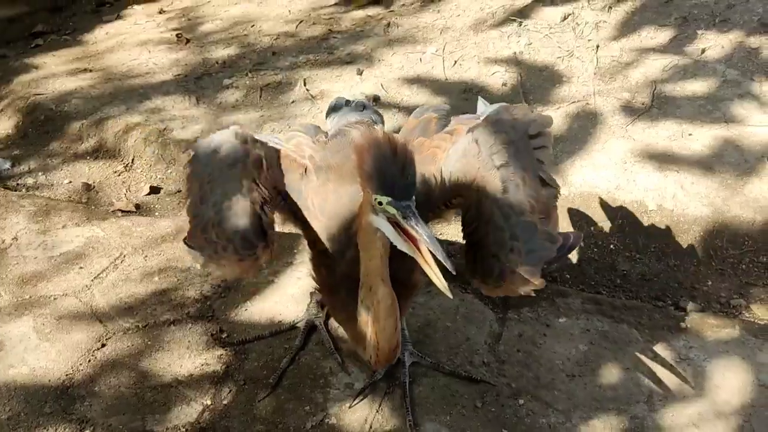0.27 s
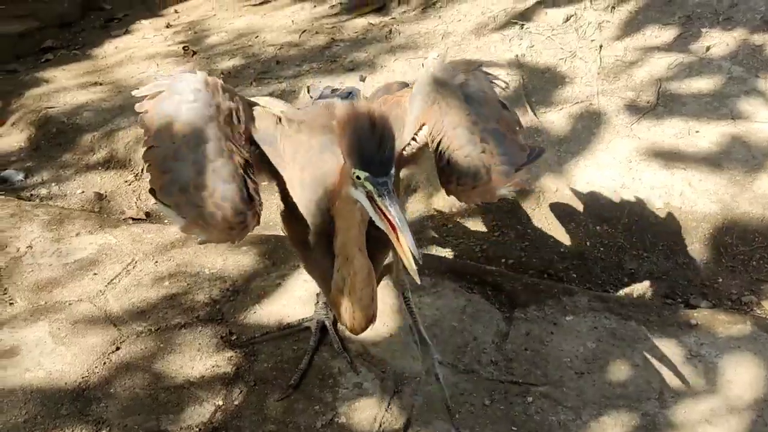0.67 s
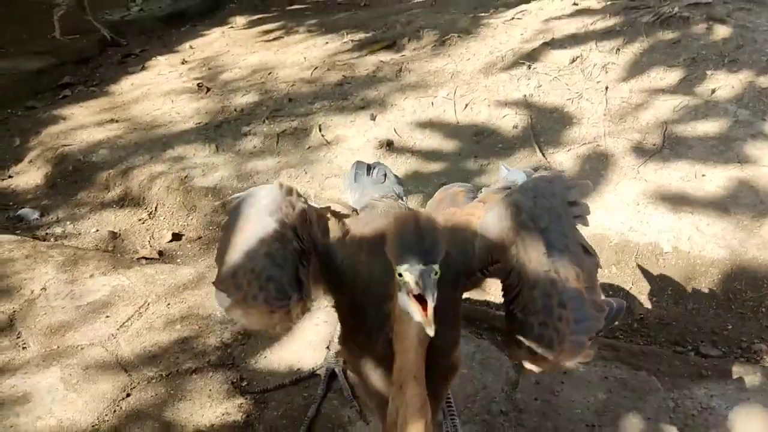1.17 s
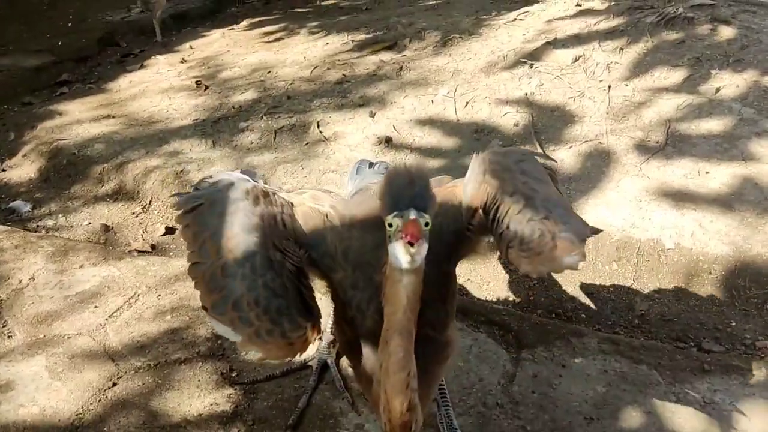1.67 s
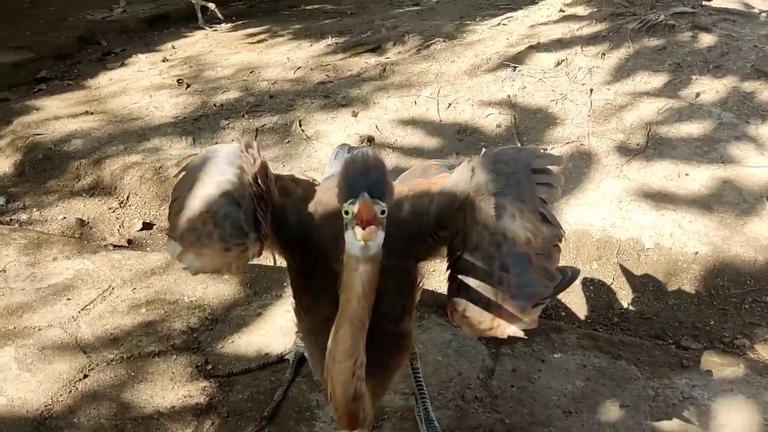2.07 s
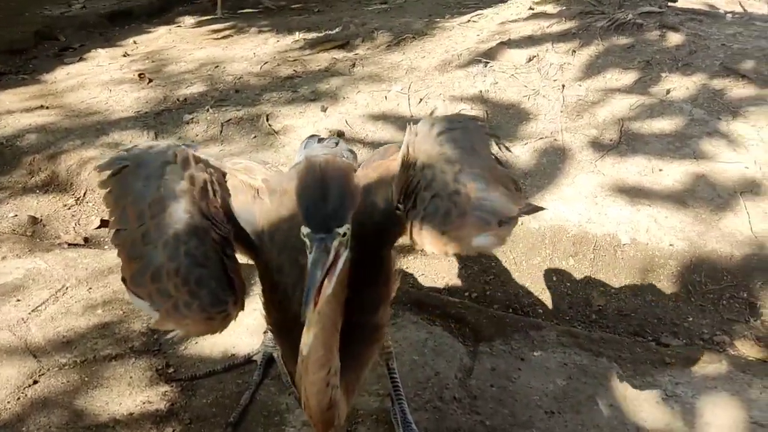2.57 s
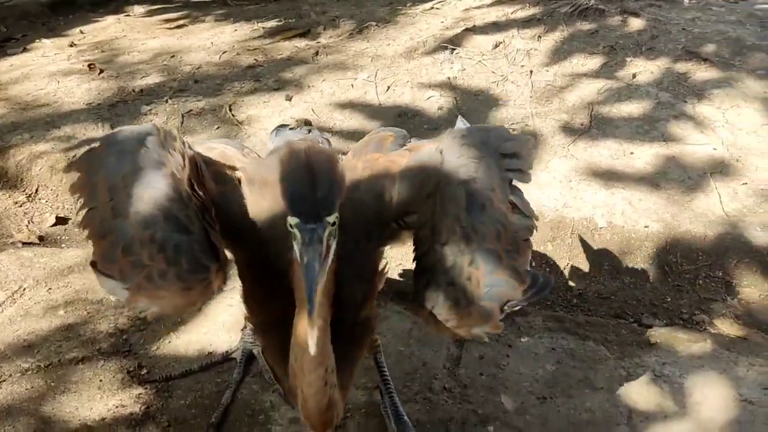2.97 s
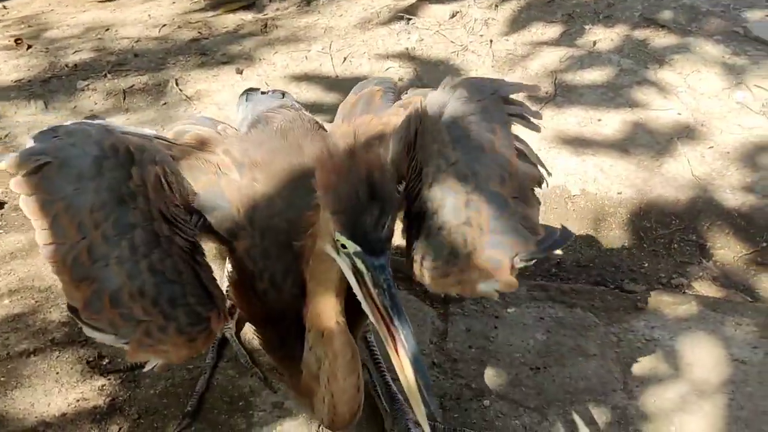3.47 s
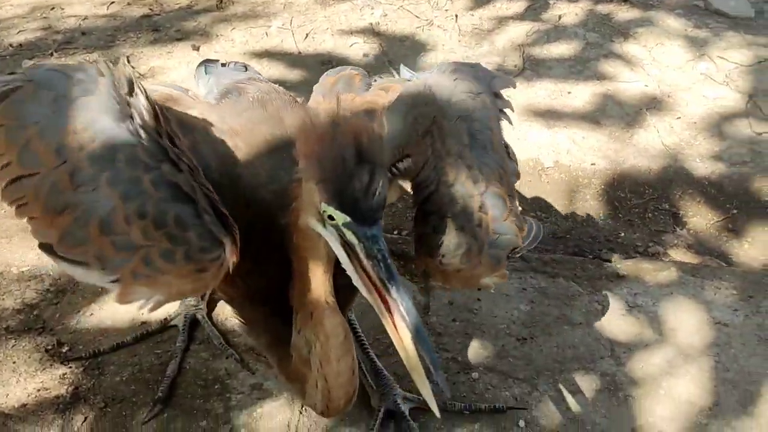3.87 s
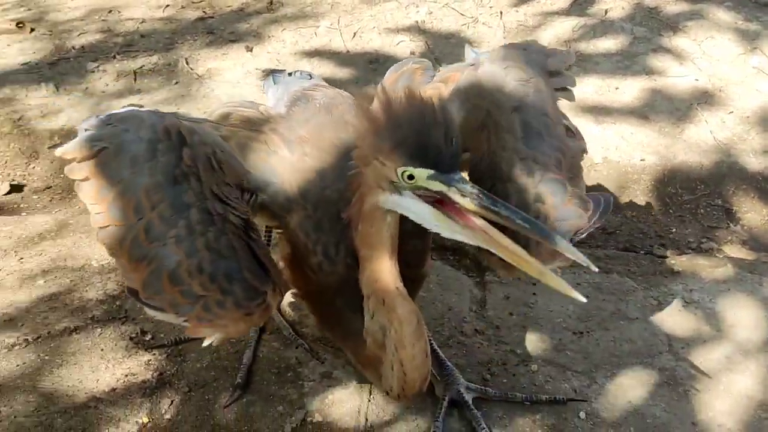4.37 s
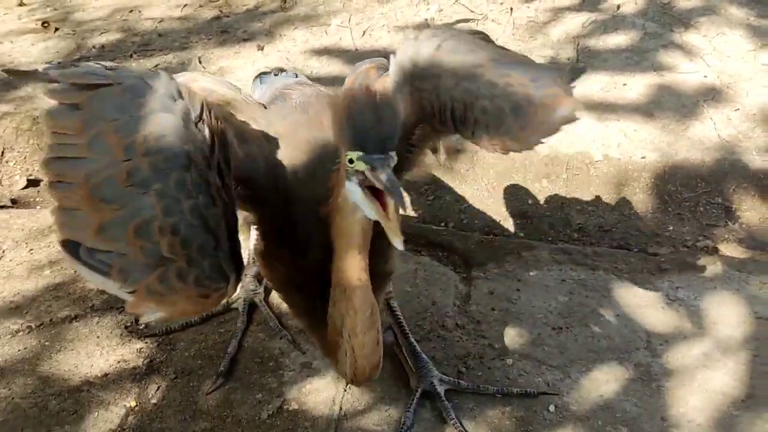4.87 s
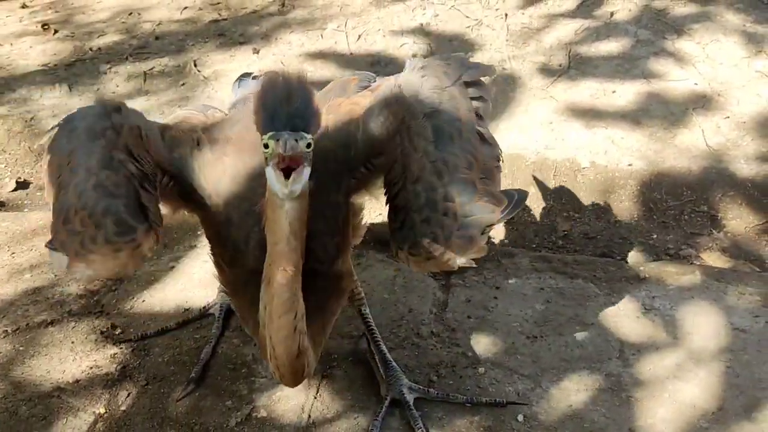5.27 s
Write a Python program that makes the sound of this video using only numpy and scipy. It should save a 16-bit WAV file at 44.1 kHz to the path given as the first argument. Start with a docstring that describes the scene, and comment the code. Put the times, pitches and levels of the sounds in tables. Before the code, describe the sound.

Rapid, raspy clacking chatter from a heron near the microphone, with tiny gasps between notes, faint outdoor hiss and a few whistled peeps.

```python
"""Harsh, rattling notes, about six a second, each led by a gasp: a young heron begs close to a camera.
Noise puffs and clicks from its syrinx pass through resonances that glide as it draws in its neck and
swings its bill over bare ground. A small bird's whistled arches peep nearby; a squeak and soft far tones
are stacked or single sines. Shaped noise makes the thin hiss that comes and goes, the rumble and the echo.
The camera's limiter ducks at loud notes, so the background swells up in the pauses."""
import sys
import numpy as np
from scipy import signal
from scipy.fft import rfft, irfft, next_fast_len
from scipy.io import wavfile
from scipy.ndimage import uniform_filter1d, minimum_filter1d

SR = 44100
rng = np.random.default_rng(int(sys.argv[2]) if len(sys.argv) > 2 else 0)


def store_pcm(level_fs):
    """Save levels as 16-bit WAV."""
    pcm = np.round(np.clip(level_fs, -1, 1) * 32767).astype(np.int16)
    wavfile.write(sys.argv[1], SR, np.atleast_2d(pcm).T)


N = 243431

# All levels are those ahead of the limiter.
# The heron's notes. Each row: first slap in seconds, seconds until the note has faded by fade_db,
# pulse rate in Hz 20 ms in, relative level in dB, dB held back at the start (negative: an accent).
NOTES = [(0.21, 0.049, 197.9, -7.5, 5), (0.542, 0.048, 167, -5.5, -5.5), (0.691, .041, 217, -1.5, 15),
         (0.854, 0.04, 200, -4, 2), (0.996, .041, 219.3, 0, 12), (1.158, 0.046, 215.8, -4.5, 3.5),
         (1.3, .042, 218.6, -4.5, -1.5), (1.467, 0.043, 213.5, -2, -3), (1.609, 0.04, 219.7, -0.5, -1.5),
         (1.752, 0.044, 212.2, -2, 10), (1.91, 0.045, 210.7, -3, 6.5), (2.069, 0.048, 209.4, -4, 3),
         (2.236, 0.048, 202.2, -4, -0.5), (2.402, 0.045, 208.3, -2.5, 1.5),
         (2.568, .052, 204.2, -2.5, -3.5), (2.93, .047, 161.2, -1.5, 7.5), (3.085, .039, 198, -2, 6),
         (3.232, 0.042, 213.4, -1, 8.5), (3.392, 0.046, 222.6, -4.5, -4.5), (3.537, 0.044, 221.2, -0.5, 11),
         (3.694, 0.039, 219, -1, 2.5), (3.85, 0.043, 218.4, -5, -4), (3.999, 0.037, 214.4, -1.5, 6),
         (4.167, .042, 208.3, -2.5, 9), (4.338, 0.046, 192.5, -4, 1), (4.516, 0.043, 195, -3.5, 1),
         (4.67, 0.043, 206.8, -2, 6.5), (5.029, .04, 179.3, -1, 3), (5.178, .027, 212.6, -3.5, 3),
         (5.315, .041, 209.7, -3.5, -1), (5.464, 0.047, 203, -2.5, 5)]


def amp(db):
    """Amplitude factor of a level in dB."""
    return 10 ** (np.asarray(db) / 20)


def unit(x):
    """The same sound at an rms of 1."""
    return x / np.sqrt(np.mean(x ** 2) + 1e-20)


def along(points, hz):
    """Values at hz, read from (Hz, value) points on a log frequency axis."""
    f, v = np.transpose(points)
    return np.interp(np.log(hz + 1), np.log(f + 1), v)


def curves(rows, t):
    """Each column after the time, read at the times t."""
    s, *cols = np.transpose(rows)
    return [np.interp(t, s, c) for c in cols]


def add(track, s, sound):
    """Mix a sound into a track from time s on."""
    i = max(round(s * SR), 0)
    part = track[..., i:i + sound.shape[-1]]
    part += sound[..., :part.shape[-1]]


def filtered(x, response):
    """Shape the spectrum of x by a complex response of frequency."""
    n = x.shape[-1]
    m = next_fast_len(n + 8192)
    spectrum = rfft(x, m) * response(np.fft.rfftfreq(m, 1 / SR))
    return irfft(spectrum, m)[..., :n]


def bell(hz, centre_hz, width_hz):
    """A resonance curve that is 1 at its centre and a half at the edges of its width."""
    return 1 / (1 + (2 * (hz - centre_hz) / width_hz) ** 2)


def causal(db):
    """The response with this gain that rings only after it is struck (minimum phase)."""
    cepstrum = irfft(db * np.log(10) / 20)
    half = len(cepstrum) // 2
    # fold the backward half onto the forward half
    cepstrum[1:half] *= 2
    cepstrum[half + 1:] = 0
    return np.exp(rfft(cepstrum))


def paired(x, alike):
    """Two unrelated signals, as middle and side, become left and right of a given likeness."""
    def balance(hz):
        angle = np.arccos(np.clip(along(alike, hz), -1, 1)) / 2
        return np.array([np.cos(angle), np.sin(angle)])

    mid, side = filtered(x, balance)
    return np.array([mid + side, mid - side])


def swells(rows, width_hz, alike):
    """Short swells of noise through one resonance; each row is timed at its loudest point."""
    track = np.zeros((2, N))
    for s, length, centre_hz, db in rows:
        swell = np.hanning(int(2 * length * SR))
        noise = rng.standard_normal((2, len(swell)))
        noise = filtered(noise, lambda hz: bell(hz, centre_hz, width_hz))
        add(track, s - length, amp(db) * swell * unit(paired(noise, [(centre_hz, alike)])))
    return track


def rush(colour, alike, patchy_db):
    """Coloured stereo noise of rms 1, with patches of random gain in time and frequency."""
    z = signal.stft(rng.standard_normal((2, N)), nperseg=512)[2]
    field = uniform_filter1d(rng.standard_normal(z.shape[1:]), size=5, axis=0)
    field = uniform_filter1d(field, size=12, axis=1)
    noise = signal.istft(z * amp(patchy_db * unit(field)), nperseg=512)[1][:, :N]
    coloured = filtered(noise, lambda hz: amp(along(colour, hz)))
    return unit(paired(coloured, alike))


def heron(fade_db=11, start_s=0.0053, chest_db=-31, octave_db=-9):
    """Each note rattles through throat and bill; the pulse rate itself hums faintly from the chest."""
    # Where the bill points. Each row: time in seconds, left over right in dB ahead of the microphones.
    bill_aim = [(.5, -2), (1.05, 3.5), (2.2, 2), (2.57, 0.5), (3.2, 3.5), (4.2, 3.5), (4.7, 0.5), (5.5, 2)]
    # Likeness of left and right. Each row: frequency in Hz, likeness (1 is the same in both).
    note_likeness = [(500, 0.88), (1700, 0.9), (2300, 0.11), (4500, 0.3), (7000, 0.084), (9000, 0.033),
                     (14000, 0.087)]
    lead_in_s, lead_in_db = .005, -20  # air starts to flow just before the first slap

    voice, chest = np.zeros((2, N)), np.zeros(N)
    t = np.arange(-lead_in_s, .08, 1 / SR)
    age = np.maximum(t, 0)
    for s, length, rate_hz, db, soft_db in NOTES:
        flow, cycles = rattle(t, rate_hz)
        lead_db = min(lead_in_db + soft_db, -6) * (age - t) / lead_in_s
        onset_db = -soft_db * np.exp(-age / start_s)
        ending_db = -fade_db * (age / length) ** 3  # the push of air ends
        effort = amp(lead_db + onset_db + ending_db)

        note = unit(filtered(flow * effort, tract(s))) * np.sqrt(np.mean(effort ** 2))
        pan_db, = curves(bill_aim, s)
        pan = amp([[pan_db / 2], [-pan_db / 2]])
        add(voice, s + t[0], amp(db) * pan * paired(note, note_likeness))

        hum = np.sin(2 * np.pi * cycles) + amp(octave_db) * np.sin(4 * np.pi * cycles)
        hum_shape = np.sin(np.pi * np.minimum(age / (length + 0.0035), 1))
        add(chest, s + t[0], amp(db + chest_db) * hum * hum_shape)
    return microphone_ports(voice) + chest


def rattle(t, rate_hz, rise=3, scatter_db=3.0, click=2.03):
    """The syrinx slaps shut at an uneven, rising rate; each slap lets out a click and a puff of its own brightness."""
    jitter, snap_s = .07, .0014  # unevenness in cycles; decay of a puff in seconds
    rasp_db, bright_db, split_hz = -14, 1.6, 5000  # steady noise; chance tilt about the split
    cycles = np.cumsum(rate_hz * (1 + rise * (t - .02))) / SR  # rise is a share per second
    cycles -= np.interp(0, t, cycles)

    chance = np.clip(rng.standard_normal((16, 3)), -1.6, 1.6)
    k = np.arange(len(chance))
    slaps = np.interp(k + jitter * chance[:, 0] * (k > 0), cycles, t)
    sizes, bright = amp(scatter_db * chance[:, 1]), amp(bright_db * chance[:, 2])

    age = t - slaps[:, None]
    puffs = np.exp(np.where(age < 0, 3 * age, -age) / snap_s)  # swells up before a slap, decays after
    noise = rng.standard_normal((2, len(t)))
    dull = filtered(noise, lambda hz: hz < split_hz)
    dull_puffs = (sizes / bright) @ puffs * dull
    bright_puffs = (sizes * bright) @ puffs * (noise - dull)
    flow = dull_puffs + bright_puffs + amp(rasp_db) * noise
    # the clicks go to the middle signal alone
    flow[0, np.minimum(np.searchsorted(t, slaps), len(t) - 1)] += click * sizes
    return flow, cycles


def tract(s):
    """Response at time s of neck, throat, mouth and bill, with bounces off the ground and the spread wings."""
    # The voice under the resonances. Each row: frequency in Hz, relative dB per Hz.
    voice_colour = [(100, -56), (300, -14), (480, -8), (620, -14.5), (800, -8.5), (1100, -12), (1600, -6.5),
                    (2500, -0.5), (4000, 1.5), (6500, -7), (8500, 2.5), (10500, -1), (13500, -18),
                    (16000, -47)]
    # A hollow that moves as the bill turns. Each row: time in seconds, centre in Hz, gain in dB.
    bill_hollow = [(.8, 5800, -7), (1.6, 6700, -4), (2.1, 6700, -16), (2.8, 6600, -4), (3.08, 3900, -14),
                   (3.24, 3400, -12), (3.55, 3700, -2), (3.85, 3500, -16), (4, 3400, -21), (4.2, 3750, -8),
                   (4.8, 3700, -2), (5.03, 6000, -5), (5.5, 6100, 0)]
    # Delay of the ground bounce, shorter as the bill is lowered. Each row: time in seconds,
    # delay in seconds ahead of its chance sway.
    ground_delay = [(.2, .00118), (1, .0012), (1.4, 0.0013), (2.2, 0.0012), (2.57, 0.0012), (3.1, 0.001067),
                    (3.4, 0.00091), (4.6, 0.0009), (5.03, 0.0009)]
    bounce, sway = 0.39, 0.019  # share the ground returns; chance change of its delay per note
    wing_share, wing_delays_s = 0.19, (0.000598, .004)  # what each wing fold returns; delay range
    # Widths in Hz of the resonances of neck, throat, mouth and bill.
    widths_hz = [370, 386, 450, 890]

    centres, heights = resonances(s)
    dip_hz, dip_db = curves(bill_hollow, s)
    ground_s = curves(ground_delay, s)[0] * (1 + sway * rng.standard_normal())
    wings_s = rng.uniform(*wing_delays_s, size=4)

    def response(hz):
        def late(delay_s):
            return np.exp(-2j * np.pi * hz * delay_s)

        peaks = sum(g * bell(hz, f, w) for f, g, w in zip(centres, heights, widths_hz))
        colour = along(voice_colour, hz) + peaks + dip_db * bell(hz, dip_hz, 620)
        bounces = bounce * late(ground_s) + wing_share * sum(map(late, wings_s))
        return causal(colour) * (1 + bounces)

    return response


def resonances(s):
    """Centres (Hz) and heights (dB) of neck, throat, mouth and bill at time s; heights vary by chance."""
    # Main resonance, in the throat. Each row: time in seconds, centre in Hz, height in dB.
    throat_glide = [(.2, 1790, 10.5), (.85, 1820, 9.5), (1.3, 1690, 4.5), (1.6, 1630, 10.5), (1.9, 1680, 9),
                    (2.55, 1840, 7.5), (3.08, 1935, 9.5), (3.4, 2310, 12), (3.55, 2270, 11), (3.9, 2490, 8),
                    (4.5, 2160, 5.5), (4.67, 2270, 12), (5.03, 1830, 13), (5.5, 1890, 9.5)]
    # Resonance of the mouth. Each row: time in seconds, centre in Hz, height in dB.
    mouth_glide = [(.2, 2430, 2), (1, 2440, 8.5), (1.35, 2250, 8), (1.8, 2250, 1.5), (2.2, 2250, 2.5),
                   (2.57, 2760, 10), (2.93, 2660, -6), (3.24, 2820, 10), (3.4, 2790, 2.5),
                   (4.35, 2840, 3.5), (5.03, 2850, 4), (5.3, 2780, 10)]
    # Low resonance of the neck: weak near 1.9 s, strong from 2.4 s, then slowly easing.
    # Each row: time in seconds, height in dB.
    neck_height = [(.2, 7), (1.9, 1), (2.4, 12), (3.1, 11.5), (5.5, 9.5)]
    # Bright ring of the bill. Each row: time in seconds, height in dB.
    bill_height = [(.2, 3), (1, 4.5), (1.6, 6.5), (2.3, 5), (3.3, 10), (4.1, 8.5), (4.7, 0.5), (5.5, 8.5)]
    neck_mean_hz, neck_follows = 1191, 0.37  # pitch with the throat at its mean; share of its glide
    bill_hz, stray_db = 8866, 1.5  # stray: chance change of each height from note to note

    throat_hz, throat_db = curves(throat_glide, s)
    mouth_hz, mouth_db = curves(mouth_glide, s)
    throat_mean_hz = np.mean(throat_glide, axis=0)[1]
    neck_hz = neck_mean_hz * (throat_hz / throat_mean_hz) ** neck_follows
    heights = np.array([*curves(neck_height, s), throat_db, mouth_db, *curves(bill_height, s)])
    heights = heights + stray_db * rng.standard_normal(len(heights))
    return [neck_hz, throat_hz, mouth_hz, bill_hz], heights


def microphone_ports(voice):
    """Each microphone port colours the close voice in its own way, and their phases differ."""
    # Left port. Each row: frequency in Hz, gain in dB.
    left_gain = [(400, -12.5), (1100, -0.5), (2300, 2), (3500, -0.5), (6300, 6), (7400, -3), (8600, -11.5),
                 (10000, -3), (12000, 3.5), (14000, 16)]
    # Right port. Each row: frequency in Hz, gain in dB.
    right_gain = [(400, -9), (1100, -4.5), (2300, -2.5), (3500, -1.5), (6300, 5), (7400, 4.5), (8600, 3.5),
                  (10000, -3.5), (12000, -1), (14000, -6)]
    # Phase between the ports. Each row: frequency in Hz, radians by which the left leads.
    left_lead = [(300, 0.5), (1100, 0.15), (1750, -0.76), (2200, -2), (3200, -2.5), (4800, -2.5),
                 (7000, -2.5), (10000, 1.5), (14000, -16)]

    def response(hz):
        gains = amp([along(left_gain, hz), along(right_gain, hz)])
        return gains * np.exp(np.array([[.5j], [-.5j]]) * along(left_lead, hz))

    return filtered(voice, response)


def wheezes():
    """The heron draws a thin, whistling gasp, noise through resonances, before each note and wheezes in a pause."""
    # Long wheezes. Each row: loudest point in seconds, width at half height in seconds,
    # centre in Hz, peak level in dB.
    long_wheezes = [(4.875, 0.17, 4850, -36.5), (4.93, 0.091, 4240, -42)]
    gasp_ahead_s, gasp_s = .018, .015  # loudest point ahead of the note; width at half height
    gasp_hz, gasp_db, whistle_hz, whistle_db = 4070, -44, 3950, -49

    times = [s - gasp_ahead_s for s, *_ in NOTES]
    gasps = swells([(s, gasp_s, gasp_hz, gasp_db) for s in times], width_hz=10000, alike=0.066)
    whistles = swells([(s, gasp_s, whistle_hz, whistle_db) for s in times], width_hz=640, alike=.1)
    return gasps + whistles + swells(long_wheezes, width_hz=640, alike=.1)


def peeps(pan_db=6, rough=0.17):
    """A small bird whistles short arches of pitch; louder ones have stronger overtones."""
    # Each row: middle in seconds, pitch in Hz ahead of the arch, level of the fundamental in dB.
    peep_calls = [(0.175, 2390, -29.5), (.255, 2380, -20), (.342, 2457, -18), (.425, 2415, -12.5),
                  (0.513, 2440, -12), (.598, 2300, -22.5), (1.396, 2030, -35), (1.56, 2050, -26),
                  (1.725, 2310, -19), (1.809, 2430, -21.5), (1.899, 2350, -20.5), (3.984, 2230, -34.5)]
    # Shape of a peep. Each row: seconds from its middle, pitch ratio, gain in dB.
    arch = [(-.018, .98, -42), (-.013, .965, -11), (-.007, .965, -5), (-.001, 1.005, 0), (.003, .975, 0),
            (.007, .89, -6), (.012, .75, -21), (.018, .66, -45)]
    # Overtones. Each row: multiple of the pitch, dB added to the overtone level.
    peep_overtones = [(2, -1), (3, -13), (4, -10), (5, -23)]
    full_scale_db, grows = -2, 0.46  # overtone level of a 0 dB peep; dB gained per dB of level

    track = np.zeros(N)
    t = np.arange(arch[0][0], arch[-1][0], 1 / SR)
    ratio, shape_db = curves(arch, t)
    for s, pitch_hz, db in peep_calls:
        overtone_db = full_scale_db + grows * db
        waver = 1 + rough * uniform_filter1d(rng.standard_normal(len(t)), size=30)
        phase = 2 * np.pi * np.cumsum(pitch_hz * ratio * waver) / SR
        overtones = sum(amp(overtone_db + g) * np.sin(k * phase) for k, g in peep_overtones)
        add(track, s + t[0], np.sqrt(2) * amp(db + shape_db) * (np.sin(phase) + overtones))
    return track * amp([[pan_db / 2], [-pan_db / 2]])


def squeak(rough=0.1):
    """A thin, reedy stack of high harmonics slides up into one of the notes."""
    # Each row: time in seconds, base pitch in Hz, level in dB.
    squeak_glide = [(2.473, 1050, -39), (2.507, 1075, -34), (2.533, 1165, -30.5), (2.56, 1276, -34),
                    (2.575, 1320, -50)]
    # Harmonics. Each row: multiple of the base pitch, relative level in dB.
    squeak_harmonics = [(4, 1), (5, 5), (6, -6), (7, -10)]

    track = np.zeros((2, N))
    t = np.arange(squeak_glide[0][0], squeak_glide[-1][0], 1 / SR)
    pitch_hz, db = curves(squeak_glide, t)
    waver = 1 + rough * uniform_filter1d(rng.standard_normal(len(t)), size=40)
    phase = 2 * np.pi * np.cumsum(pitch_hz * waver) / SR
    tone = unit(sum(amp(g) * np.sin(k * phase) for k, g in squeak_harmonics))
    add(track, squeak_glide[0][0], amp(db) * tone)
    return track


def yard(x, gap_s=0.0066):
    """Walls and trees scatter a faint noise tail, drawn anew for each third of a second of sound."""
    # Each row: frequency in Hz, time in seconds to die away by 60 dB.
    echo_t60 = [(200, .25), (1000, 0.26), (2500, 0.25), (8000, 0.26), (14000, 0.41)]
    # Each row: frequency in Hz, relative level in dB.
    echo_colour = [(200, -20), (1000, 2.5), (2500, 9.5), (5000, 8.5), (8500, 6), (14000, -4)]

    wet = np.zeros((2, N))
    step = SR // 3
    for i in range(0, N, step):
        hz, t, z = signal.stft(rng.standard_normal((2, SR // 2)), SR, nperseg=256)
        decay_db = -60 * t / along(echo_t60, hz)[:, None]
        tail_db = along(echo_colour, hz)[:, None] + decay_db
        tail = signal.istft(z * amp(tail_db), SR, nperseg=256)[1]
        tail = tail / np.linalg.norm(tail[0])
        add(wet, i / SR + gap_s, signal.fftconvolve(x[:, i:i + step], tail, axes=1))
    return wet


def far_tones(waver=0.0076):
    """Soft sines with wavering pitch drift in from far off."""
    # Each row: start in seconds, length in seconds, start and end pitch in Hz ahead of the waver,
    # level in dB.
    tone_glides = [(1.65, 0.885, 700, 677, -55), (2.1, 0.58, 493.5, 511, -55), (2.62, 0.27, 706, 730, -54),
                   (2.68, 0.15, 586, 532, -57), (4.78, 0.21, 838, 833, -59.5), (4.85, 0.18, 565, 612, -61),
                   (4.9, 0.19, 915, 885, -71)]

    track = np.zeros(N)
    for s, length, start_hz, end_hz, db in tone_glides:
        n = int(length * SR)
        drift = unit(uniform_filter1d(rng.standard_normal(n), size=800))
        pitch_hz = np.linspace(start_hz, end_hz, n) * (1 + waver * drift)
        tone = unit(np.sin(2 * np.pi * np.cumsum(pitch_hz) / SR))
        add(track, s, amp(db) * tone * signal.windows.tukey(n))
    return track


def background(air_db=-55):
    """Low outdoor rumble, faint air and a thin hiss, each of shaped noise."""
    # Hiss over time. Each row: time in seconds, level in dB.
    hiss_level = [(.1, -52.5), (.3, -31.5), (.75, -52), (1.12, -45.5), (1.36, -28.5), (1.75, -24),
                  (2.36, -39), (2.6, -30), (2.85, -52.5), (3.22, -28.5), (3.52, -35.5), (3.7, -42.5),
                  (4.45, -49), (4.78, -35), (5.02, -45), (5.3, -38.5), (5.52, -45)]
    # Each row: frequency in Hz, relative dB per Hz.
    hiss_colour = [(880, -56), (1500, -13), (2430, -5), (2700, -3), (3470, -4.5), (4950, 1.5), (6120, -7),
                   (8750, 4), (11600, -12), (14000, -16), (15500, -35)]
    # Rumble over time. Each row: time in seconds, level in dB.
    rumble_level = [(.1, -66.5), (.28, -43.5), (.5, -37.5), (.75, -41), (1.2, -43.5), (1.75, -41),
                    (2.2, -41.5), (2.8, -40.5), (3.3, -42.5), (3.8, -44), (4.6, -43), (5.52, -40)]
    # Each row: frequency in Hz, relative dB per Hz.
    rumble_colour = [(15, -8), (25, -1), (33, -6), (47, 5.5), (62, 0), (85, .5), (100, -6), (120, -5),
                     (250, -6.5), (390, -18.5), (560, -11), (750, -19), (1200, -21), (2400, -24.5),
                     (5000, -50)]
    # Low swells of rumble. Each row: loudest point in seconds, width at half height in seconds,
    # centre in Hz, peak level in dB.
    rumble_swells = [(.39, 0.1, 72.6, -43), (.48, 0.09, 73, -38), (4.85, 0.074, 99, -42.5),
                     (4.97, 0.077, 69.6, -50)]

    t = np.arange(N) / SR
    rumble_noise = rush(rumble_colour, [(100, .9), (300, .7), (2000, .4)], patchy_db=1.2)
    rumble = amp(curves(rumble_level, t)[0]) * rumble_noise
    hiss = amp(curves(hiss_level, t)[0]) * rush(hiss_colour, [(3000, 0.013)], patchy_db=0.0)
    air_colour = [(300, -20), (2000, 0), (9000, -5), (14000, -11)]  # (Hz, relative dB per Hz)
    air = amp(air_db) * rush(air_colour, [(3000, .2)], patchy_db=1.5)
    return rumble + swells(rumble_swells, width_hz=41, alike=0.98) + hiss + air


def scene(echo_db=-21, peep_echo_db=-25):
    """The birds, their echo, the far tones and the open air."""
    chatter, small_bird = heron(), peeps()
    echo = yard(amp(echo_db) * chatter + amp(peep_echo_db) * small_bird)
    return chatter + wheezes() + small_bird + squeak() + echo + far_tones() + background()


def limiter(x, threshold_db=-13, range_db=12, hold_s=0.075, ahead_s=0.0049, release_s=0.011):
    """The gain drops just ahead of a loud sound, is held, then comes back quickly."""
    power = uniform_filter1d(np.mean(x ** 2, axis=0), size=130)
    level_db = 10 * np.log10(np.abs(power) + 1e-12)
    needed_db = -np.clip(2 * (level_db - threshold_db), 0, range_db)  # 2 dB down per dB over
    span = int((hold_s + ahead_s) * SR) | 1
    held_db = minimum_filter1d(needed_db, span, origin=span // 2 - int(ahead_s * SR))
    pole = np.exp(-1 / (release_s * SR))
    released_db = np.minimum(held_db, signal.lfilter([1 - pole], [1, -pole], held_db))
    return x * amp(uniform_filter1d(released_db, size=260))


def record(dry):
    """The camera's sound opens after a moment, passes the limiter, rounds off peaks and ends at its band limit."""
    top_hz = 14350
    opened = np.clip((np.arange(N) / SR - .1) / .004, 0, 1)  # silent for 0.1 s, then a 4 ms fade-in
    limited = limiter(dry * opened)
    rounded = limited / (1 + np.abs(limited / .92) ** 8) ** (1 / 8)  # peaks stay under 0.92
    return filtered(rounded, lambda hz: 1 / np.sqrt(1 + (hz / top_hz) ** 120))


dry = scene()
out = record(dry)
store_pcm(out)
```